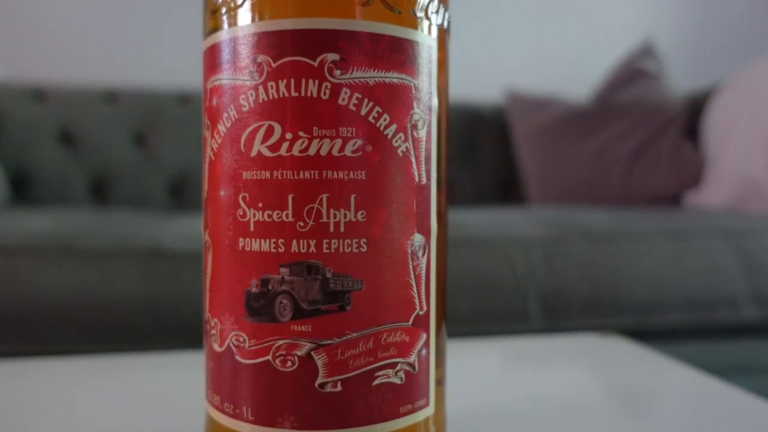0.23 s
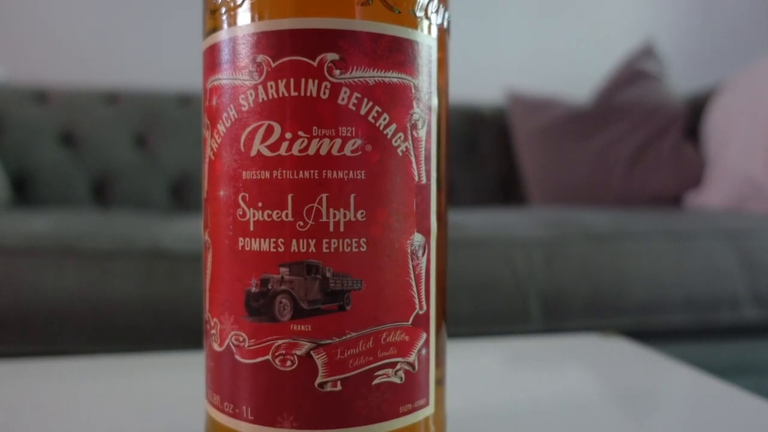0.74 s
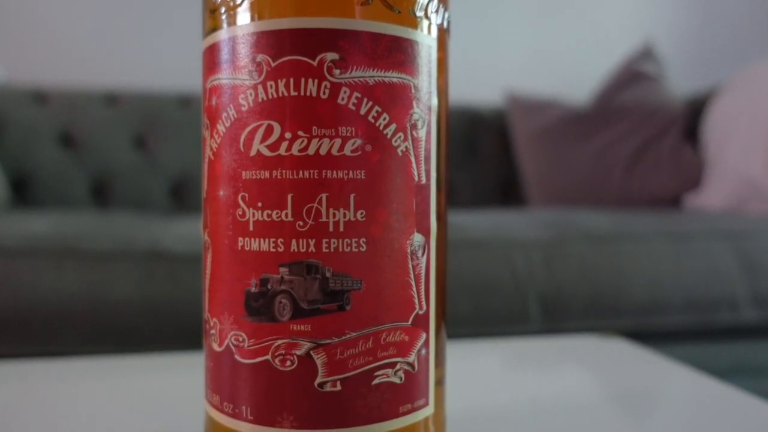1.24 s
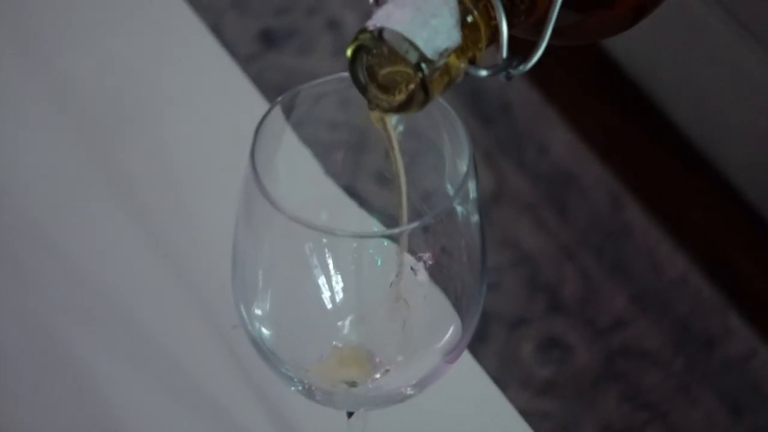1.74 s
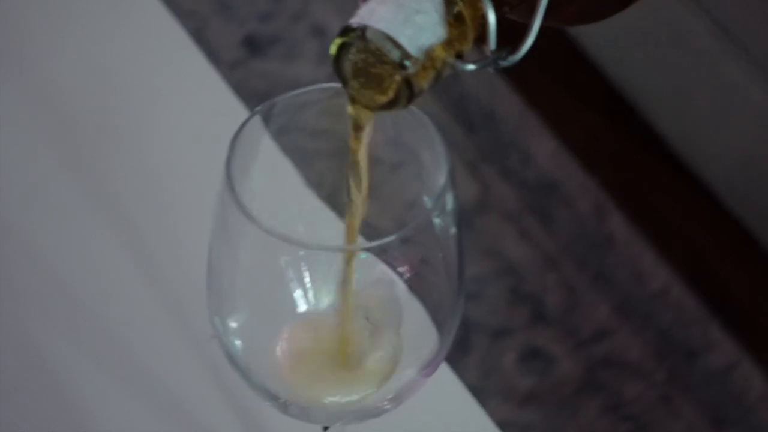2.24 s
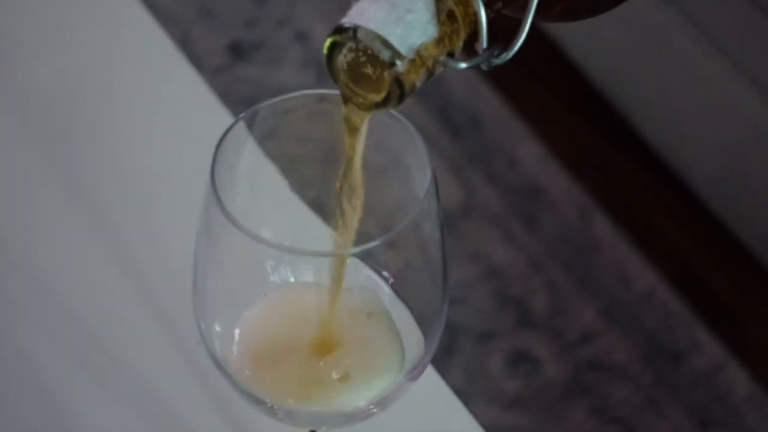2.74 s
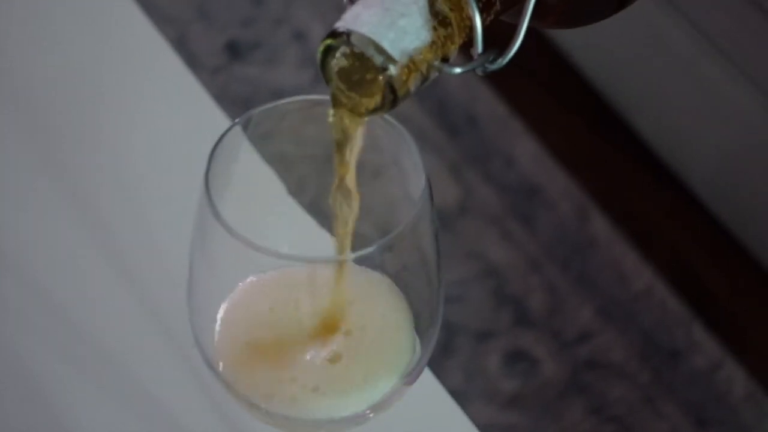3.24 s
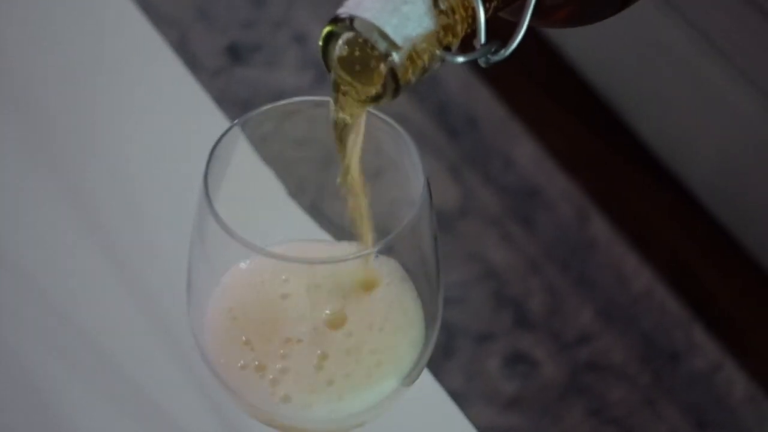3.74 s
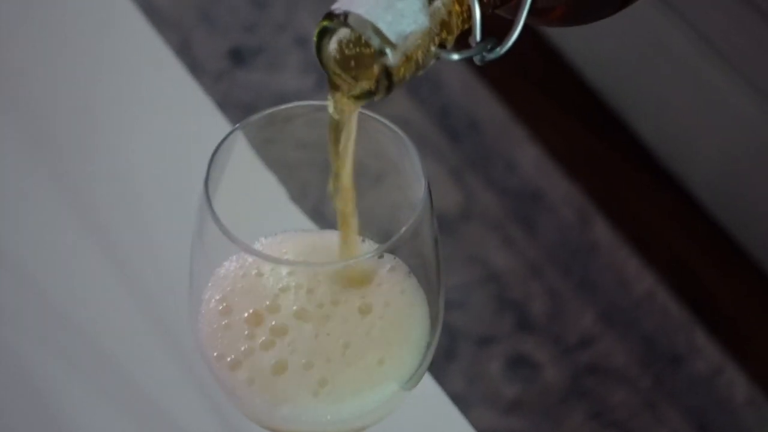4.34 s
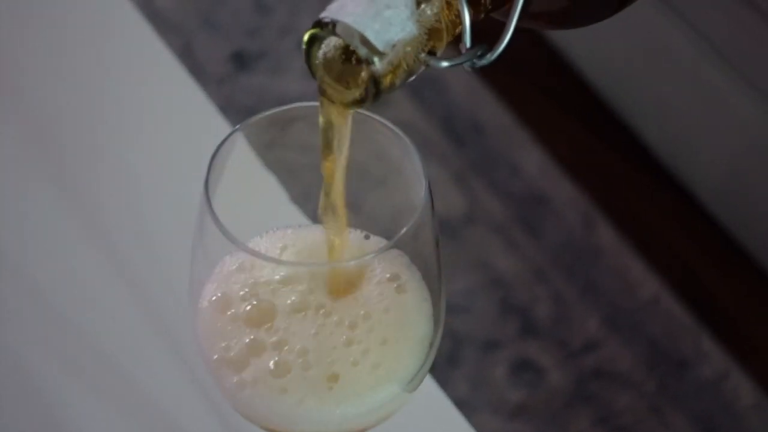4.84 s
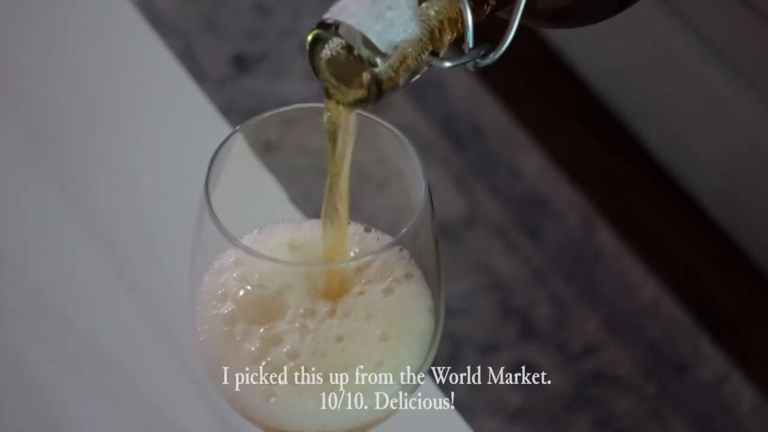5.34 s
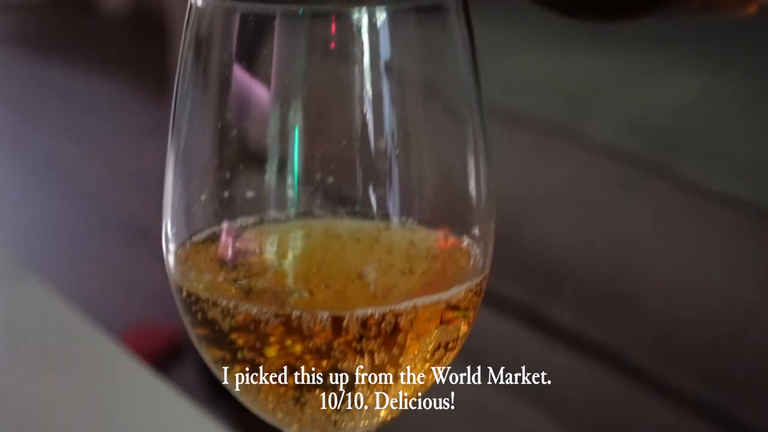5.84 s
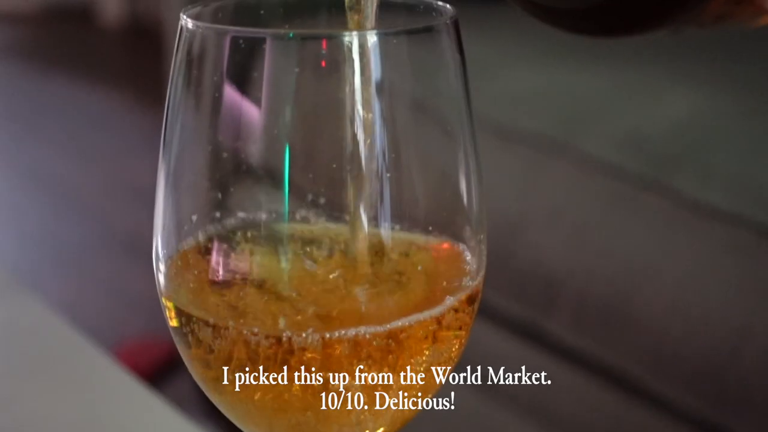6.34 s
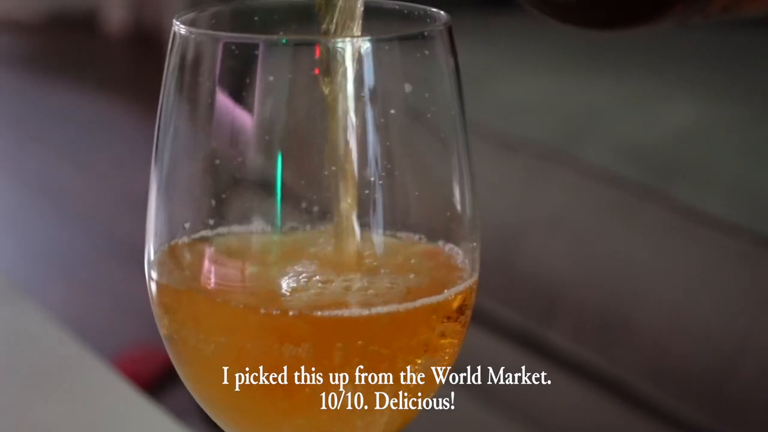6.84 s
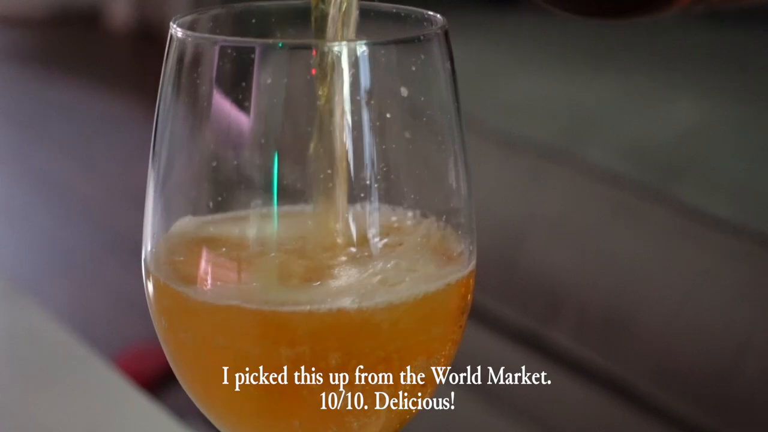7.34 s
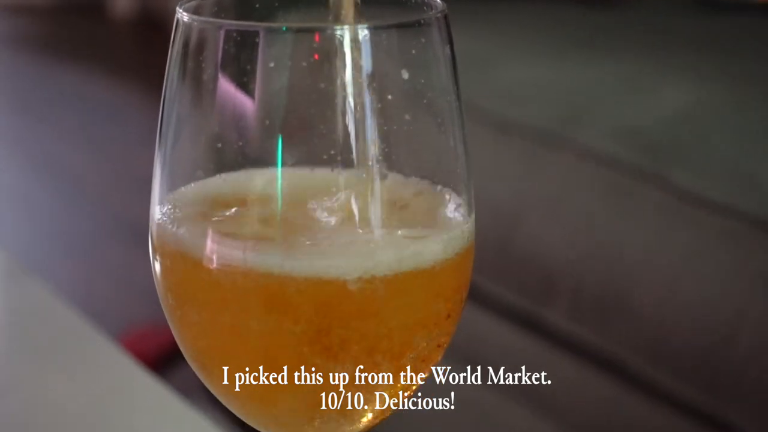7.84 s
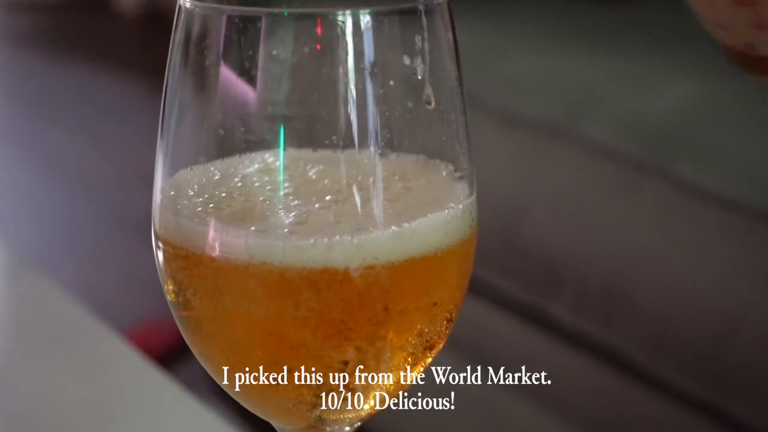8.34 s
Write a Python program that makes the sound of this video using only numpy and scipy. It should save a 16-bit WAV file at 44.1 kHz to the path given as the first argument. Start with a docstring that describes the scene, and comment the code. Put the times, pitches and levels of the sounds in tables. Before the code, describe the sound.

Close-miked pouring in a dry furnished room. First only a soft rumbling hum; then a bottle clinks with a low thump, its neck gulps rhythmically about four times a second, and drops patter and plop in a wine glass as fine foam hisses. After a sudden cut, a second pour plunges into standing drink, brighter and wetter, with chirping droplets and ringing glass, ending cut off mid-fizz.

```python
"""Sparkling drink poured into a wine glass

Three shots joined by hard cuts: the room hums alone; a bottle clinks and pours, gulping air, over fizzing foam;
then a second pour splashes into a fuller glass. The last cut is to silence. Fizz is random clicks coloured
by the bowl; gulps, air pockets and droplets are damped sines; slaps are pulses and short noise bands;
glass is ringing modes; the room is shaped noise."""
import sys
import numpy as np
from scipy import signal
from scipy.fft import rfft, irfft, next_fast_len
from scipy.io import wavfile
from scipy.ndimage import uniform_filter1d, map_coordinates

SR = 44100
rng = np.random.default_rng(int(sys.argv[2]) if len(sys.argv) > 2 else 0)


def file_out(sig):
    """Save sig as 16-bit WAV at sys.argv[1]."""
    # one column per channel
    cols = np.atleast_2d(sig).T
    # limit, then scale
    lim = np.clip(cols, -1, 1)
    pcm = np.round(lim * 32767).astype(np.int16)
    wavfile.write(sys.argv[1], SR, pcm)


N = 378333
TIME = np.arange(N) / SR  # seconds through the whole sound
RING = np.arange(SR // 8) / SR  # seconds through one short sound

STILL, FIRST, SECOND = (0, 1.536), (1.536, 5.85), (5.85, 7.845)  # start and end of each shot, s
LANDS_FIRST_S, LANDS_SECOND_S = 2.2, 6.15  # each stream reaches the glass

# The largest drops striking the liquid; levels are relative, before the trims of each part:
# start_s [s], slap_db [dB], bubble_hz [Hz], body_db [dB], tick_db [dB]
DROP_IMPACTS = [(2.03, -46, 4500, -56, -39), (2.0428, -36.5, 5000, -38, -40),
                (2.0548, -32.5, 4800, -28.5, -35), (2.069, -34.5, 10850, -42.5, -24.5),
                (2.088, -36, 5170, -36.5, -28), (2.105, -40.5, 6000, -38, -36),
                (2.151, -39, 4800, -29.5, -44), (2.165, -46, 10500, -52, -35),
                (2.233, -35, 4000, -48, -40.5), (2.2762, -32, 7000, -47.5, -35),
                (2.2872, -32, 5190, -46.5, -27.5), (2.299, -31, 5030, -33.5, -42),
                (2.3067, -25.5, 5030, -30, -37), (2.3112, -44, 10000, -50.5, -37),
                (2.3297, -41.5, 10000, -48, -39), (2.3528, -25, 3870, -40, -29),
                (2.3625, -40, 5000, -48, -36), (2.379, -29, 5200, -34, -33),
                (2.3865, -29, 4020, -29.5, -35.5), (2.46, -37, 4200, -46.5, -43),
                (2.4793, -29.5, 6600, -37.5, -31), (2.486, -37, 6000, -45.5, -33.5),
                (2.501, -31, 5700, -50, -48), (2.5092, -35, 3992, -47, -37), (2.55, -27.5, 4620, -38, -45),
                (2.61, -40, 4300, -37, -48), (2.6278, -35.5, 5050, -29, -42),
                (2.6477, -33.5, 3990, -30, -37.5), (2.782, -32.5, 4720, -41, -43),
                (3.7035, -41.5, 4400, -52, -52), (5.1995, -41, 4300, -46, -50),
                (5.4442, -38, 4400, -46, -46.5), (5.701, -39, 4400, -38, -50),
                (6.1577, -20, 3880, -28, -27.5), (6.1658, -26, 10700, -48, -25.5),
                (6.2493, -23.5, 6360, -44.5, -32.5), (6.34, -34, 5000, -45, -45),
                (6.368, -39.5, 7930, -47.5, -30.5), (6.3725, -21, 6070, -24, -27.5),
                (6.405, -37.5, 7600, -40, -29.5), (6.536, -32.5, 3080, -37, -40.5),
                (6.5727, -29, 3950, -37, -33), (6.607, -29, 3890, -25.5, -37),
                (6.628, -33.5, 5230, -31, -40), (6.655, -37.5, 4360, -38.5, -42),
                (6.681, -39.5, 3900, -33, -37.5), (6.717, -40, 6500, -43.5, -31),
                (6.807, -33, 3870, -38, -42), (6.9096, -29.5, 3100, -28, -29),
                (6.938, -36.5, 3680, -35.5, -46.5), (6.972, -35, 7500, -40, -39),
                (6.977, -18.5, 6760, -22.5, -24), (7.178, -29.5, 3540, -24.5, -27),
                (7.2028, -36, 4200, -32.5, -45.5), (7.2612, -43, 6000, -42, -32.5),
                (7.346, -36, 3140, -26.5, -47.5), (7.3655, -35.5, 3200, -37, -46.5),
                (7.376, -37, 3000, -34, -48), (7.443, -44, 9000, -46, -37), (7.490, -45.5, 11000, -52, -33),
                (7.6065, -36.5, 3230, -33, -27), (7.647, -39.5, 7000, -50, -45),
                (7.679, -43, 9000, -45, -36), (7.8165, -30.5, 3390, -48, -56), (7.837, -28, 4200, -31, -54)]
# Ringing modes of the wine glass's wall: pitch_hz [Hz], relative_db [dB], t60_s [s]
WALL_MODES = [(2526, 2.5, 0.11), (3057, -2.5, 0.08), (3315, -7, 0.086), (3880, -12, 0.1),
              (5015, -2.5, 0.088), (5373, -12.5, .1), (6260, -2.5, 0.043), (6510, -10, 0.16),
              (7130, -14.5, .1)]


def amp(db):
    """Decibels to gain."""
    return 10 ** (np.asarray(db) / 20)


def unit(x):
    """Scale x to rms 1."""
    return x / np.sqrt(np.mean(x ** 2) + 1e-20)


def along(points, hz):
    """Read a (Hz, value) curve on a log frequency axis."""
    f, v = np.transpose(points)
    return np.interp(np.log(hz + 1), np.log(f + 1), v)


def filtered(x, response):
    """Multiply the spectrum of x by a response of frequency, padded so that ringing does not wrap round."""
    n = x.shape[-1]
    m = next_fast_len(n + SR // 5)
    spectrum = rfft(x, m) * response(np.fft.rfftfreq(m, 1 / SR))
    return irfft(spectrum, m)[..., :n]


def coloured(x, spectrum):
    """Weight x by a (Hz, dB) curve and scale it to rms 1."""
    return unit(filtered(x, lambda hz: amp(along(spectrum, hz))))


def resonate(x, modes):
    """Add to x the ringing of (Hz, width Hz, dB) resonances, each a second-order bandpass."""
    def response(f):
        bands = (amp(db) * 1j * f * w / (c * c - f * f + 1j * f * w) for c, w, db in modes)
        return 1 + sum(bands)
    return filtered(x, response)


def add(track, s, sound):
    """Mix a sound into the track at s seconds."""
    part = track[round(s * SR):][:len(sound)]
    part += sound[:len(part)]


def shot(span):
    """A gate that is 1 inside a shot and 0 outside, with fades of a few milliseconds."""
    inside = (TIME >= span[0]) & (TIME < span[1])
    return uniform_filter1d(inside * 1., size=384)


def fade(t, t60):
    """A decay of 60 dB in t60 seconds."""
    return amp(-60 * t / np.maximum(t60, .0005))


def swell(s, attack, hold, t60):
    """An envelope that rises from s seconds, holds and dies away."""
    rise = np.clip((TIME - s) / attack, 0, 1)
    return rise * fade(np.maximum(TIME - s - attack - hold, 0), t60)


def wobble(rate):
    """A smooth random curve through rate knots a second."""
    return map_coordinates(rng.standard_normal(1024), [TIME * rate], mode="wrap")


def ping(hz, t60, attack, rise=0):
    """A damped sine whose pitch shifts by the share rise as it dies."""
    life = max(t60, .001)
    pitch = hz * (1 + rise * np.minimum(RING / life, 1))
    phase = np.cumsum(pitch) / SR
    return np.sin(2 * np.pi * phase) * fade(RING, life) * (1 - np.exp(-RING / attack))


def peak_band(x, lo_hz, hi_hz):
    """Bandpass x and scale it to peak 1."""
    band = signal.sosfilt(signal.butter(2, [lo_hz, hi_hz], "band", fs=SR, output="sos"), x)
    return band / np.abs(band).max()


def crack(lo_hz, hi_hz, t60):
    """A short band of decaying noise with peak 1."""
    return peak_band(rng.standard_normal(len(RING)) * fade(RING, t60), lo_hz, hi_hz)


def snap(lo_hz, hi_hz):
    """One sharp pressure pulse, band-limited, with peak 1."""
    return peak_band((RING == 0) * 1., lo_hz, hi_hz)


def pops(rate, spread_db):
    """Bursting bubbles, on average rate a second: many small clicks and a few large, at rms 1."""
    size = amp(spread_db * np.minimum(rng.exponential(size=N), 4))
    bursts = rng.random(N) < rate / SR
    return unit(bursts * size * rng.choice([-1, 1], N))


def bowl_pitch(s):
    """The air above the drink rings higher as the glass fills and its column shortens."""
    # pitch as the stream lands, Hz; rise, Hz per s; landing time, s
    hz, rise, lands = (710, 20, LANDS_FIRST_S) if s < SECOND[0] else (865, 28, LANDS_SECOND_S)
    return hz + rise * (s - lands)


def fizz(flow, bowl, lands_s, churn_db, foam_db, spray_db, bubble_db, chirp_db, churn_follows):
    """The stream churns the liquid and bubbles burst in foam and fine spray, all coloured by the bowl."""
    # Colours of the liquid, the foam and the spray: pitch_hz [Hz], relative_db [dB]
    churn_colour = [(150, -25), (330, 5), (520, 0), (700, 8), (950, 1), (1300, 2), (1800, -31.5),
                    (3000, -41)]
    foam_colour = [(700, -24.5), (1400, 2.5), (2100, 2.5), (3200, 0.5), (4300, -3), (6500, -10.5),
                   (8500, -45), (14000, -39.5)]
    spray_colour = [(3000, -7.5), (6500, 3.5), (8500, -1.5), (10700, 0), (13000, -4), (15800, -10.5)]
    s, *columns = np.transpose(flow)
    surge_db = .5 * wobble(rate=11)
    foam, spray = (np.interp(TIME, s, c) + surge_db for c in columns)
    mean_foam = np.mean(columns[0])
    churn = mean_foam + churn_follows * (foam - mean_foam)  # dB of churn for each dB of foam
    liquid = amp(churn + churn_db) * coloured(pops(rate=1500, spread_db=1.5), churn_colour)
    head = amp(foam + foam_db) * coloured(pops(rate=5500, spread_db=3.0), foam_colour)
    mist = amp(spray + spray_db) * coloured(pops(rate=13000, spread_db=3.0), spray_colour)
    small = bubbles(foam + bubble_db, count=2500, centre_hz=4200, spread=.45, cycles=6, size_db=3.5)
    large = bubbles(churn + chirp_db, count=420, centre_hz=3500, spread=0.25, cycles=3.5, size_db=2.5)
    return resonate(liquid + head + mist + small + large * (TIME > lands_s), bowl)


def bubbles(level_db, count, centre_hz, spread, cycles, size_db):
    """Small bubbles ring for a few cycles, rising slightly, as the stream drags them under."""
    when, pitch, size = rng.uniform(0, N / SR, count), rng.standard_normal(count), rng.standard_normal(count)
    hz = np.clip(centre_hz * np.exp(spread * pitch), 2200, 14000)[:, None]
    t = RING[:SR // 100]
    age = t * hz / cycles
    gain = amp(size_db * np.clip(size, -2, 2))[:, None]
    tone = np.sin(2 * np.pi * hz * t * (1 + 0.0083 * age))
    waves = gain * tone * np.exp(-age) * (1 - np.exp(-4 * age))
    index = (when * SR).astype(int)[:, None] + np.arange(len(t))
    mixed = np.bincount(index.ravel(), waves.ravel(), N)[:N]
    return amp(level_db) * unit(mixed)


def pockets(s, level_db, rate, attack, hold, t60, spread):
    """Lesser air pockets in the pool keep the bowl murmuring, dying away as the foam smothers them."""
    pitches = bowl_pitch(s + attack + hold / 2) * (1 + spread * np.linspace(-1, 1, 5))
    murmur = 0
    for hz in pitches:
        note = ping(hz, t60=0.038, attack=0.00059)
        murmur = murmur + signal.fftconvolve(pops(rate / len(pitches), spread_db=3.0), note)[:N]
    return amp(level_db) * swell(s, attack, hold, t60) * unit(murmur)


def gulps():
    """Air slips into the bottle neck with a click and a short blip, its overtone brighter when strong."""
    # Air gulped through the neck: start_s [s], level_db [dB, before a common trim], pitch_hz [Hz]
    gulp_rows = [(1.78, -28, 2100), (2.0547, -26.5, 2170), (2.2982, -35, 2260), (2.5509, -25.5, 2280),
                 (2.7817, -30, 2250), (3.0145, -27.5, 2300), (3.2276, -29, 2260), (3.451, -30, 2240),
                 (3.7015, -43.5, 2350), (3.968, -36.5, 2180), (4.2253, -37, 2080), (4.4897, -42, 2010),
                 (4.7296, -40, 2110), (4.9581, -42.5, 2060), (5.1996, -39, 2200), (5.444, -43.5, 2150)]
    track, mean_db = np.zeros(N), np.mean(gulp_rows, axis=0)[1]
    for s, db, hz in gulp_rows:
        overtone_db = -6.5 + 0.673 * (db - mean_db)  # grows with each dB of strength
        overtone = amp(overtone_db) * ping(2.074 * hz, t60=0.003, attack=0.00021)
        blip = ping(hz, t60=0.016, attack=0.000083) + overtone
        click = amp(-9.5) * snap(2500, 8000)
        add(track, s + 0.00074, amp(db + 1.5) * (blip + click))
    return track


def plops(twin_db=-17, twin_spread=.06):
    """Each large air pocket sounds a hollow note, sheds a smaller one and leaves the bowl ringing."""
    # Large pockets closing under the stream:
    # start_s [s], level_db [dB, before a common trim], t60_s [s], pitch_hz [Hz at onset]
    plop_rows = [(2.0544, -20.5, 0.0039, 790), (2.3536, -31, 0.067, 704.2), (2.3868, -28, 0.05, 711),
                 (2.4802, -29, 0.041, 707), (2.5099, -26, 0.054, 718), (2.539, -34, 0.045, 716),
                 (2.583, -40, 0.032, 700), (2.6415, -35, 0.027, 716), (2.53, -37.5, 0.055, 720),
                 (2.5492, -26.5, 0.035, 701), (2.569, -27.5, 0.033, 687), (2.6483, -32, 0.037, 665),
                 (2.726, -28.5, 0.034, 716), (2.7426, -34, 0.04, 710), (2.7878, -33.5, 0.062, 720),
                 (2.8031, -29, 0.029, 730), (2.8162, -29.5, 0.064, 727), (2.8419, -26.5, 0.036, 691),
                 (3.0314, -36.5, 0.028, 730), (3.1962, -33, 0.019, 730), (3.3104, -37, 0.023, 740),
                 (3.3295, -22, 0.011, 720), (6.1492, -33.5, 0.018, 858), (6.574, -39.5, 0.091, 880),
                 (6.6063, -33, 0.071, 858), (6.6284, -33.5, 0.068, 874), (6.7422, -26.5, 0.051, 890),
                 (6.7639, -35.5, 0.03, 900), (6.776, -37.5, 0.056, 890), (6.8591, -30, 0.037, 888.5),
                 (6.9096, -32.5, 0.024, 880), (6.9771, -29.5, 0.061, 877), (7.0514, -21.5, 0.012, 877),
                 (7.0626, -31, 0.012, 910), (7.0835, -29, 0.022, 960), (7.112, -38.5, 0.022, 848),
                 (7.1776, -19.5, 0.015, 880), (7.2032, -18.5, 0.017, 836), (7.3464, -29, 0.014, 834),
                 (7.3662, -25.5, 0.0094, 918), (7.376, -25, 0.01, 980), (7.4424, -32.5, 0.028, 904),
                 (7.58, -41, .05, 902), (7.606, -37, 0.065, 875), (7.6627, -23.5, 0.015, 745),
                 (7.676, -36, 0.021, 775), (7.694, -34, 0.026, 953), (7.7605, -32, 0.024, 976),
                 (7.8365, -22, 0.016, 938)]
    track = np.zeros(N)
    for s, db, t60, hz in plop_rows:
        hollow = ping(hz, t60, attack=0.0012, rise=0.027)
        bowl = amp(-27.0) * ping(bowl_pitch(s), t60=0.15, attack=0.0023)
        rush = amp(-15.5) * crack(690, 1200, t60=0.024)
        add(track, s, amp(db + 2.5) * (hollow + bowl + rush))
        lag, size = rng.random(2)
        twin = ping(hz * (1 + twin_spread * size), t60=0.033, attack=0.00074)
        add(track, s + .0015 + .004 * lag, amp(db + twin_db) * twin)
    return track


def splashes():
    """The large drops land one by one."""
    track = np.zeros(N)
    for s, *drop in DROP_IMPACTS:
        add(track, s, splash(s, *drop))
    return track


def splash(s, slap_db, hz, body_db, tick_db):
    """A drop slaps, with a dull body and a bright tick, and throws more spatter the harder it lands."""
    mean_db = np.mean(DROP_IMPACTS, axis=0)[1]
    spatter_db = -16 if s < SECOND[0] else -15.5  # beside a slap of mean strength
    spatter_db = mean_db + spatter_db + 0.9 * (slap_db - mean_db)
    body = amp(body_db - 6.5) * (crack(2050, 3000, t60=0.012) + .5 * ping(2400, t60=0.011, attack=.0002))
    tick = amp(tick_db - 7.0) * crack(7500, 12500, t60=0.0073)
    spatter = amp(spatter_db) * crack(2400, 8000, t60=0.089)
    return amp(slap_db) * slap(s, hz) + body + tick + spatter


def slap(s, hz):
    """A drop snaps drily on the shallow drink and more wetly on the deep; both ring a tiny bubble."""
    if s < SECOND[0]:
        contact = amp(-2.5) * snap(2400, 7500) + amp(-7.5) * crack(2900, 6800, t60=0.002)
        return contact + amp(-3.5) * ping(hz, t60=0.0065, attack=0.00063, rise=.042)
    contact = amp(-6.5) * snap(2400, 9000) + amp(-7.0) * crack(3000, 7500, t60=0.0068)
    return contact + amp(-4.0) * ping(hz, t60=.011, attack=0.00062, rise=0.035)


def shower(s, length, count, slap_db, body_db, tick_db, centre_hz):
    """Lesser drops fall at uneven intervals while the surface is still free of foam."""
    track = np.zeros(N)
    for k, (slip, size, pitch) in enumerate(rng.uniform(-0.65, 1, (count, 3))):
        when = s + length * (k + (1 + slip) / 2) / count
        gain_db, hz = 3 * size, centre_hz * np.exp(.35 * pitch)
        add(track, when, splash(when, slap_db + gain_db, hz, body_db + gain_db, tick_db + gain_db))
    return track


def droplets(cycles=44, lag_s=0.003, twin_db=-4):
    """A droplet traps a tiny bubble that chirps upward; a weaker twin follows at another pitch."""
    # Chirping droplets: start_s [s], level_db [dB, before a common trim], pitch_hz [Hz at onset]
    droplet_rows = [(5.7005, -36, 3200), (6.1521, -26, 4300), (6.171, -37.5, 6700), (6.191, -30, 2900),
                    (6.2105, -37, 9400), (6.214, -22.5, 5860), (6.219, -35, 8200), (6.233, -32, 9300),
                    (6.2445, -37, 9300), (6.246, -31, 5500), (6.25, -19, 6850), (6.253, -29, 2980),
                    (6.271, -33, 6500), (6.281, -35, 13020), (6.3236, -28, 6830), (6.355, -42, 3170),
                    (6.357, -38, 8200), (6.403, -24, 7790), (6.410, -34.5, 3600), (6.44, -42, 2000),
                    (6.493, -29, 3120), (6.4967, -29, 9600), (6.588, -31, 3000), (6.616, -35, 3300),
                    (6.638, -28, 3960), (6.9, -28, 4350), (6.972, -28.5, 4400), (6.977, -25.5, 3120),
                    (7.042, -37, 3300), (7.131, -36, 2450), (7.155, -38, 4400), (7.164, -37, 2980),
                    (7.648, -39, 6200), (7.826, -36, 3270), (7.829, -35, 4200), (7.8364, -34, 3730),
                    (7.8362, -32, 4480)]
    track = np.zeros(N)
    for s, db, hz in droplet_rows:
        add(track, s, amp(db + 0.5) * ping(hz, cycles / hz, attack=0.0008, rise=0.05))
        twin_hz = hz * np.exp(0.14 * rng.standard_normal())
        twin = ping(twin_hz, cycles / twin_hz, attack=.0006, rise=0.097)
        add(track, s + lag_s * (.5 + rng.random()), amp(db + twin_db) * twin)
    return track


def plunge(s=6.15):
    """The stream digs into standing drink: a low gurgle, wet splatter and a shower of glassy droplets."""
    track, t = np.zeros(N), TIME[:SR]
    splatter_colour = [(1500, -24.5), (3000, -2.0), (6500, -6.5), (9000, -6), (15000, -19.0)]  # Hz, dB
    splatter = coloured(pops(rate=700, spread_db=1.5)[:SR], splatter_colour)
    add(track, s, amp(-51) * splatter * fade(t, t60=0.99))
    gurgle_colour = [(120, -18.0), (330, 0.5), (480, 0.5), (800, 3.5), (1500, -26.5)]  # Hz, dB
    gurgle = coloured(pops(rate=490, spread_db=0.0)[:SR], gurgle_colour)
    add(track, s, amp(-46.0) * gurgle * fade(t, t60=1.4))
    for delay, pitch, size in rng.random(size=(60, 3)):
        droplet = ping(4700 * 2 ** (1.2 * pitch), t60=0.012, attack=0.0003, rise=.07)
        add(track, s + 0.027 + 0.26 * delay, amp(-44.5 - 9 * size) * droplet)
    return track


def wall_rings(others_db=-13):
    """Drops flung at the glass ring its wall; where each lands decides which mode is favoured."""
    # Hard hits on the wall: start_s [s], ring_db [dB, before the mode's own level], favoured_hz [Hz]
    hit_rows = [(6.158, -32.5, 2528), (6.166, -32.5, 2528), (6.249, -30, 6510), (6.34, -35, 5015),
                (6.371, -31, 6260), (6.254, -41.5, 2528), (6.275, -46, 2528), (6.375, -41.5, 2528),
                (6.608, -43, 3057), (7.017, -46, 2528), (7.066, -44, 2528), (7.236, -45.5, 2528),
                (6.464, -40.5, 2528), (6.573, -42, 2528), (6.806, -38, 2528), (6.977, -39, 2528),
                (7.205, -42.5, 2528), (7.29, -42, 2528), (7.348, -43, 2528)]
    track = np.zeros(N)
    for s, ring_db, main_hz in hit_rows:
        main = np.argmin([abs(hz - main_hz) for hz, _, _ in WALL_MODES])
        for k, (hz, db, t60) in enumerate(WALL_MODES):
            offset_db = 0 if k == main else others_db + rng.normal(0, 3.7)
            add(track, s, amp(ring_db + db + offset_db) * ping(hz, t60, attack=0.00033))
    return track


def wall_shimmer(level_db, rate, octave_db, hold, t60):
    """Fine droplets keep the wall ringing; the softer they land, the weaker its high modes (octave_db)."""
    lowest, ring = WALL_MODES[0][0], 0
    for hz, db, life in WALL_MODES:
        mode = signal.fftconvolve(pops(rate, spread_db=3.0), ping(hz, life, attack=.0003))[:N]
        ring = ring + amp(db + octave_db * np.log2(hz / lowest)) * unit(mode)
    return amp(level_db) * unit(ring) * swell(LANDS_SECOND_S, attack=.012, hold=hold, t60=t60)


def patter(s=2.4, t60=3.3):
    """The stream crackles on the bare bottom of the glass, fading as the foam cushions it."""
    track = np.zeros(N)
    tick = crack(3400, 10000, t60=.0008)
    ticks = unit(signal.fftconvolve(pops(rate=300, spread_db=2.0), tick)[:N])
    add(track, s, amp(-65.0) * ticks * fade(TIME, t60))
    return track


def clink(rasp_db=-3):
    """The bottle knocks with a low thump and chatters once; its glass modes ring on with wavering phase."""
    # The knock and its rebound: start_s [s], level_db [dB, scales the whole contact], contact_hz [Hz]
    knock_rows = [(1.536, -46, 4030), (1.5536, -46.5, 3900)]
    # Modes of the bottle: pitch_hz [Hz], relative_db [dB], t60_s [s]
    bottle_modes = [(256.5, 1.5, 0.37), (337, 2, .19), (455, 4, 0.15), (625, 3.5, 0.14), (925, -13, 0.26),
                    (1090, -10, 0.16), (1900, -11, 4.8), (1980, -16, 4), (2225, 0, 0.09), (2900, -9, 0.1),
                    (5620, -13.5, 0.65), (5560, -18, 0.302), (7768, -25, 0.34), (8156, -18, 0.25),
                    (8660, -18, 0.25)]
    # Colour of the thud: pitch_hz [Hz], relative_db [dB]
    thud_colour = [(88, -32), (150, -9), (860, -4), (939, -0.5), (1620, -15.5), (2140, -7), (3570, -39),
                   (4010, -16), (5000, -52), (6500, -66), (11000, -120)]
    track, t = np.zeros(N), TIME[:SR]
    for s, level_db, contact_hz in knock_rows:
        contact = ping(contact_hz, t60=.065, attack=.0003, rise=-.02)
        contact += amp(rasp_db) * crack(0.96 * contact_hz, 1.08 * contact_hz, t60=.03)
        contact += amp(4.0) * crack(1970, 2900, t60=.04)
        add(track, s, amp(level_db) * contact)
    ring = 0
    for hz, db, t60 in bottle_modes:
        phase = 2 * np.pi * (hz * t + rng.random()) + 0.39 * wobble(rate=70)[:SR]
        ring = ring + amp(db) * fade(t, t60) * np.sin(phase)
    ring = ring * (1 - np.exp(-t / 0.0013))
    thud = coloured(rng.standard_normal(SR), thud_colour) * fade(t, t60=0.6) * (1 - np.exp(-t / 0.0026))
    thump = crack(250, 480, t60=0.11)
    start_s = knock_rows[0][0]
    add(track, start_s, amp(-36.5) * thump)
    add(track, start_s, amp(-43.5) * ring + amp(-41) * thud)
    return track


def table_echo(x, delay=0.0012):
    """A faint early reflection off the table, opposite in sign left and right, widens the glass a little."""
    # Echo off the table top: pitch_hz [Hz], relative_db [dB]
    table_colour = [(300, -18.5), (1000, -26.5), (4000, -27.5), (9000, -42.5)]
    echo = filtered(x, lambda hz: amp(along(table_colour, hz)) * np.exp(-2j * np.pi * hz * delay))
    return np.array([echo, -echo]) / np.sqrt(2)


def reverb(x):
    """A furnished room answers each channel with its own noise tail, decaying at a rate set by frequency."""
    # Decay of the room: pitch_hz [Hz], t60_s [s]
    room_decay = [(200, 0.17), (2000, 0.36), (10000, 0.034)]
    hz, t, z = signal.stft(rng.standard_normal((2, SR // 3)), SR, nperseg=256)
    tail = signal.istft(z * fade(t, along(room_decay, hz)[:, None]), SR, nperseg=256)[1]
    return signal.fftconvolve(x[None], tail / np.linalg.norm(tail[0]), axes=1)[:, :N]


def air(spectrum, side_db):
    """Steady room noise: a shared middle plus a side signal opposite in sign left and right."""
    mid, side = coloured(rng.standard_normal((2, N)), spectrum)
    return mid + amp(side_db) * np.array([side, -side])


def room_tone():
    """Ventilation hums as shaped, resonant noise, wavering a little, with a different colour in each shot."""
    # Colours of the rumble, fan and hums: pitch_hz [Hz], relative_db [dB]
    rumble_still = [(15, -53), (25, -46), (48, -20), (61, -3.5), (90, -6), (113, -2), (134, -4.5),
                    (156, -11), (179, -9), (237, -12.5), (262, -10.5), (286, -21), (333, -15), (430, -14.5),
                    (520, -28.5), (680, -64.5), (1140, -120)]
    fan_still = [(280, -46), (480, -18.5), (593, -16), (637, -13.5), (733, -12), (1040, -9.5), (1170, -6),
                 (1440, -12), (1940, -14.5), (2110, -22), (2500, -24), (4280, -36), (12200, -41.5),
                 (12900, -44), (14000, -73.5)]
    hum_first = [(15, -61), (25, -29), (48, -46), (68, -20), (113, -6.5), (134, -5.5), (154, -5.5),
                 (174, -1), (200, -1.5), (262, -9.5), (300, -9.5), (370, -15), (409, -33.5), (446, -13),
                 (480, -15.5), (620, -57.5), (1060, -120)]
    hum_second = [(15, -63.5), (25, -30.5), (38, -47.5), (54, -25), (90, -8), (113, 5), (145, -1.5),
                  (188, 4.5), (268, -6), (296, -6), (384, -11.5), (446, -11.5), (480, -17.5), (620, -40),
                  (1060, -120)]
    # Resonances of the low ventilation, the fan and the first pour's hum:
    # pitch_hz [Hz], width_hz [Hz], relative_db [dB]
    motor = [(65.8, 5.1, -1), (124.5, 5.3, -0.5)]
    whine = [(1149, 8.9, 7.5), (1270, 74, -15), (1990, 110, -14)]
    duct = [(168.3, 9, 3), (189.2, 6.5, 2), (457.5, 22, -4)]
    rumble_db = -48.2 - 2.5 * np.clip(TIME - .9, 0, 1) + 1.8 * wobble(rate=13.3)  # sinks from 0.9 s
    rumble = amp(rumble_db) * unit(resonate(air(rumble_still, side_db=-14), motor))
    fan = amp(-54.0) * resonate(air(fan_still, side_db=-10.5), whine) * amp([[-1], [1]])  # right louder
    first_db = -49.0 + 1.0 * wobble(rate=12)
    first = amp(first_db) * unit(resonate(air(hum_first, side_db=-18.0), duct))
    second = amp(-51.5) * air(hum_second, side_db=-17.5)
    # soft, wide draught noise: Hz, dB
    draught_colour = [(150, -15.5), (350, 2.5), (700, 1.0), (1200, -1.5), (2000, 3), (3000, -8.5), (9000, -64.5)]
    draught = amp(-58.5) * air(draught_colour, side_db=-4.0)
    return (rumble + fan) * shot(STILL) + (first + draught) * shot(FIRST) + (second + draught) * shot(SECOND)


def scene():
    """The glass leans a little to one side by frequency; single drops scatter more widely than the fizz."""
    # Fizzing of each pour: start_s [s], foam_db [dB], spray_db [dB], both before the trims in fizz
    flow_first = [(1.7, -61.5, -69.5), (2.04, -57, -62.5), (2.23, -52, -56.5), (2.41, -52, -57.5),
                  (3.13, -53.5, -62), (3.87, -55, -64), (4.3, -54, -62.5), (4.37, -50, -61),
                  (4.45, -53.5, -62), (5.35, -53, -59.5), (5.69, -51, -60), (5.84, -49.5, -59)]
    flow_second = [(5.87, -55.5, -61.5), (6.184, -53, -63.5), (6.352, -48, -62.5), (6.646, -51, -61.5),
                   (6.882, -50, -57), (7.13, -48, -54.5), (7.66, -48.5, -57)]
    # Resonances of the bowl in each pour: pitch_hz [Hz], width_hz [Hz], relative_db [dB]
    bowl_first = [(646, 32, -3), (879, 95, 2), (1960, 170, 0), (2520, 190, -3.5), (3150, 150, -5),
                  (4060, 160, -8), (5050, 200, -10), (5800, 120, -3.5), (6700, 280, -11), (7450, 99, -11),
                  (9020, 100, -10), (9580, 200, -7.5), (10550, 400, -7), (11500, 200, -9),
                  (13300, 200, -11), (14100, 200, -8)]
    bowl_second = [(939, 68, -0.5), (1310, 190, 1), (1840, 67, 4.5), (2650, 54, 4.5), (3200, 180, 1),
                   (3900, 87, -4.5), (4350, 260, -1), (4770, 110, -8), (5600, 65, 2), (6170, 150, -6.5),
                   (6380, 140, -4.5), (7100, 77, -9.5), (8100, 100, -7), (9600, 300, -7.5),
                   (10900, 200, -10.5), (12950, 250, -8.5), (13950, 170, -3.5)]
    # Stereo balance of the whole: pitch_hz [Hz], left_minus_right_db [dB]
    lean = [(200, -0.8), (700, -1.5), (1200, -1.3), (2200, -1.5), (4500, 0.2), (8000, -0.2)]
    drops = splashes()
    drops += shower(LANDS_FIRST_S, length=0.63, count=12, slap_db=-37.5, body_db=-43.5, tick_db=-50,
                    centre_hz=4880)
    drops += shower(LANDS_SECOND_S, length=1.0, count=20, slap_db=-46.5, body_db=-40.5, tick_db=-46,
                    centre_hz=3870)
    first = fizz(flow_first, bowl_first, LANDS_FIRST_S, churn_db=-3.0, foam_db=-4.5, spray_db=-1.0,
                 bubble_db=-12.0, chirp_db=-25, churn_follows=0.53)
    first += patter()
    first += pockets(2.17, level_db=-50, rate=90, attack=0.14, hold=0.49, t60=6.1, spread=0.055)
    second = fizz(flow_second, bowl_second, LANDS_SECOND_S, churn_db=-7.0, foam_db=-6, spray_db=-0.5,
                  bubble_db=-12.0, chirp_db=-13.5, churn_follows=1.3)
    second += plunge()
    second += wall_shimmer(level_db=-53, rate=120, octave_db=1.0, hold=0.18, t60=.6)
    second += wall_shimmer(level_db=-58, rate=39, octave_db=-7.0, hold=1.45, t60=1.5)
    second += pockets(6.48, level_db=-51.0, rate=97, attack=0.1, hold=0.65, t60=3.1, spread=.09)
    impacts = resonate(drops, bowl_first) * shot(FIRST) + resonate(drops, bowl_second) * shot(SECOND)
    impacts += droplets() + wall_rings()
    drink = first * shot(FIRST) + second * shot(SECOND) + impacts + gulps() + plops() + clink()

    def scattering(hz):  # duller, and 1 ms late
        return amp(along([(5000, -0.5), (10000, -10)], hz)) * np.exp(-2j * np.pi * hz * 0.001)
    scatter = amp(-21) * filtered(impacts, scattering) * np.array([[1], [-1]])
    whole = drink + table_echo(drink) + scatter + amp(-32.0) * reverb(drink) + room_tone()
    return filtered(whole, lambda hz: amp(along(lean, hz) * np.array([[.5], [-.5]])))


def record(dry):
    """The sound stops dead at the last cut; nothing passes above the band limit."""
    top_hz = 15900
    return filtered(dry * shot((STILL[0], SECOND[1])), lambda hz: hz < top_hz)


dry = scene()
out = record(dry)
file_out(out)
```